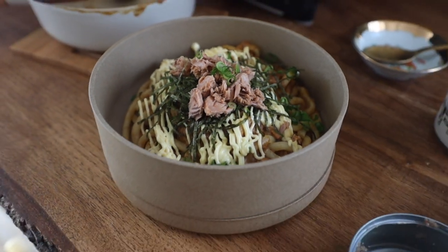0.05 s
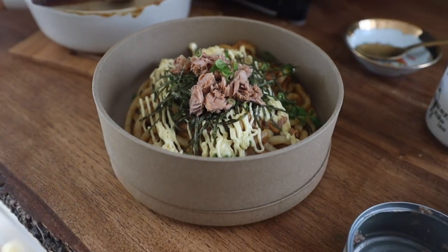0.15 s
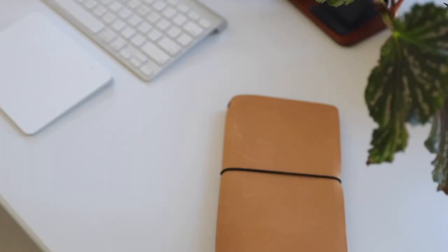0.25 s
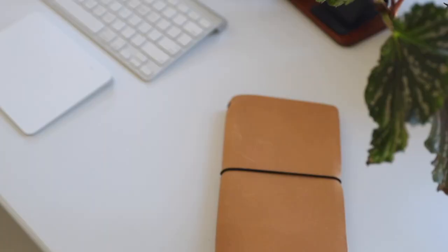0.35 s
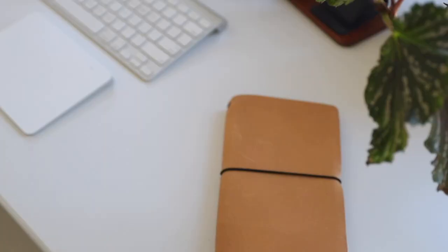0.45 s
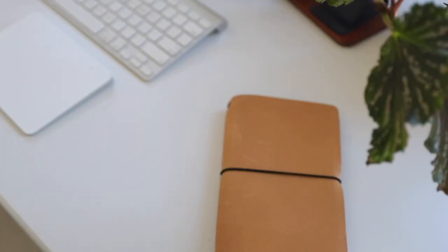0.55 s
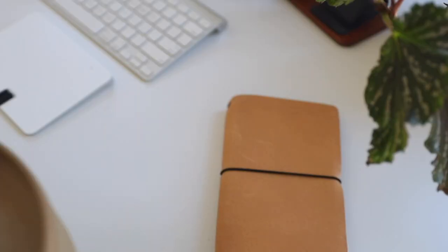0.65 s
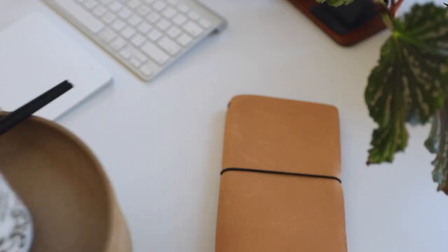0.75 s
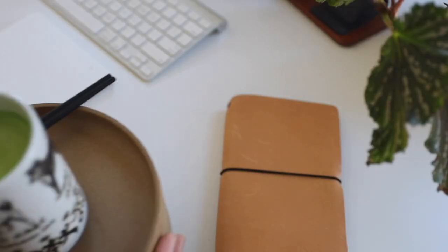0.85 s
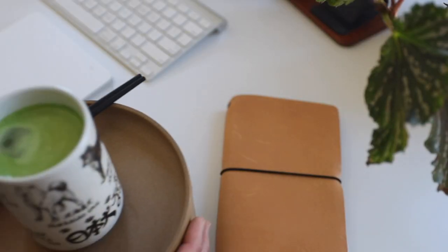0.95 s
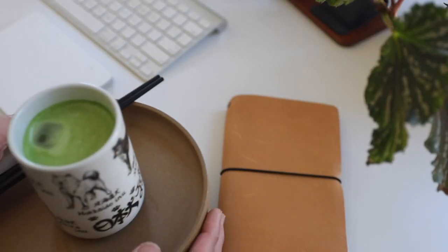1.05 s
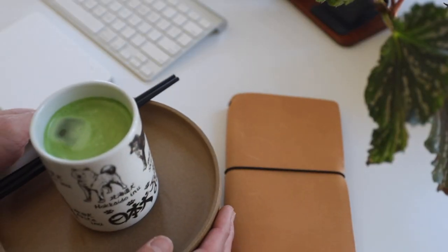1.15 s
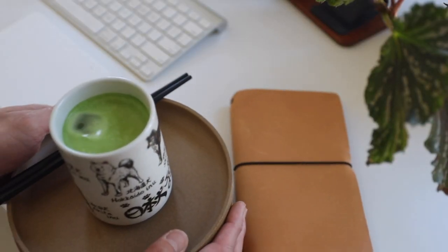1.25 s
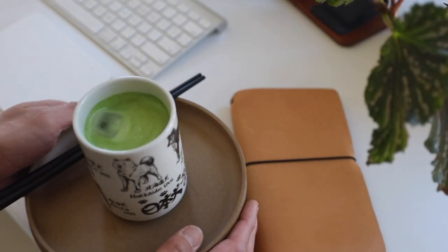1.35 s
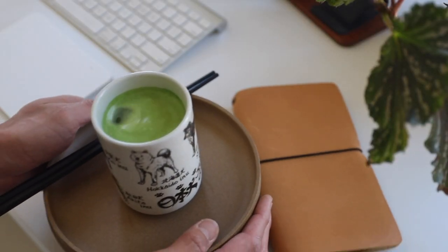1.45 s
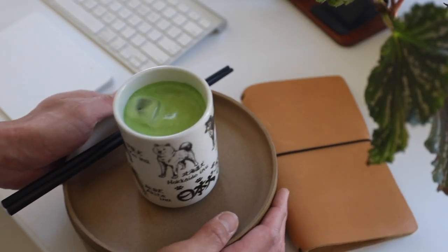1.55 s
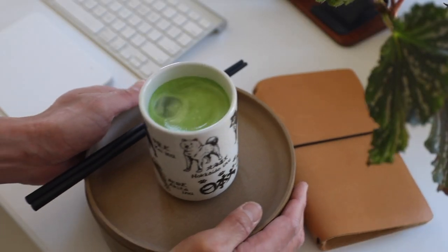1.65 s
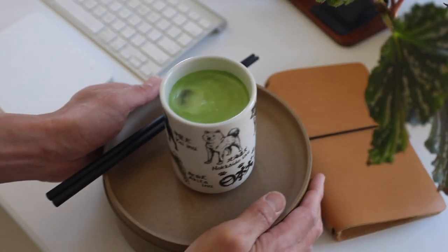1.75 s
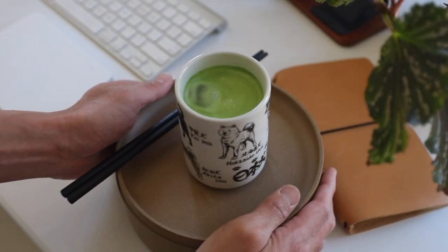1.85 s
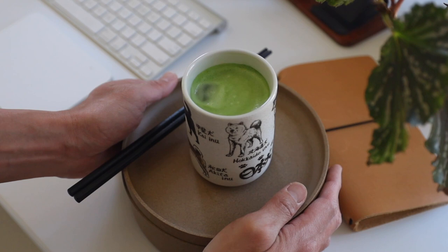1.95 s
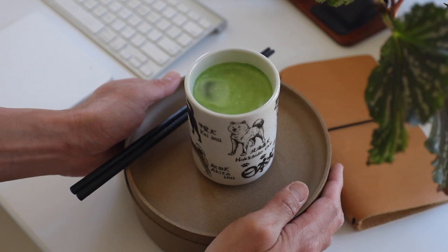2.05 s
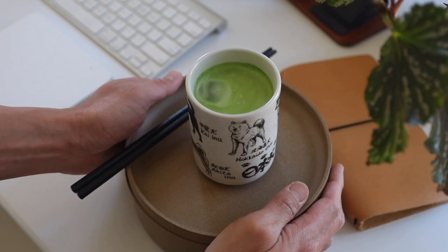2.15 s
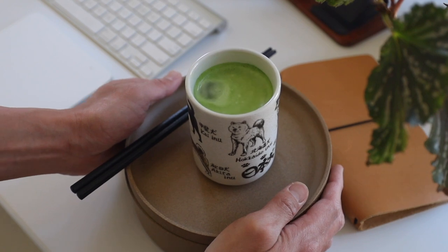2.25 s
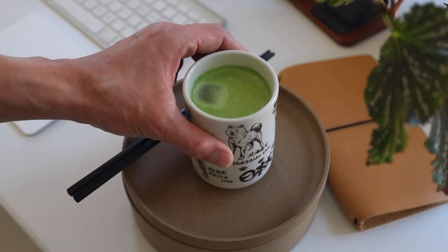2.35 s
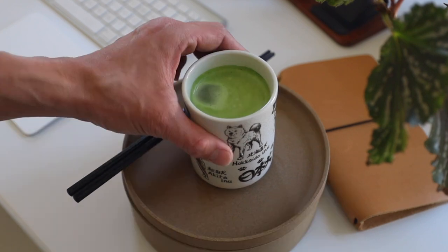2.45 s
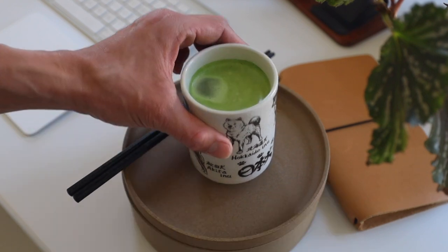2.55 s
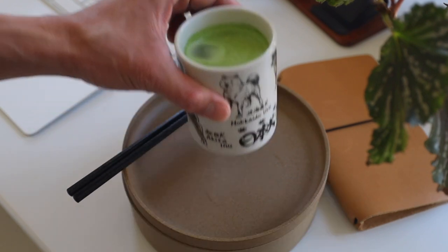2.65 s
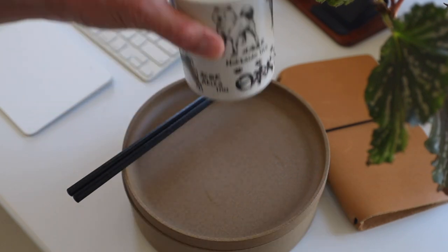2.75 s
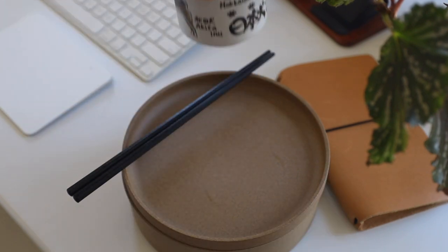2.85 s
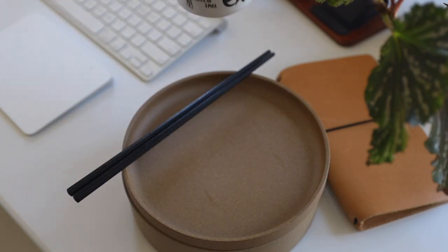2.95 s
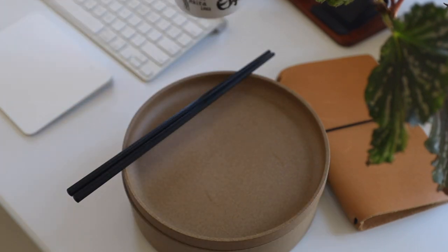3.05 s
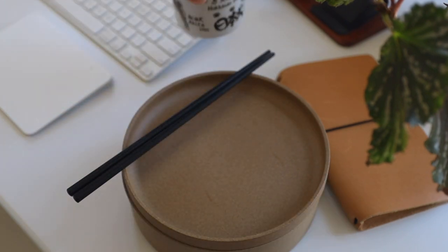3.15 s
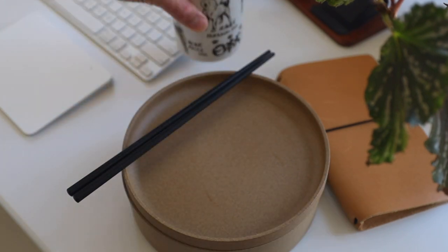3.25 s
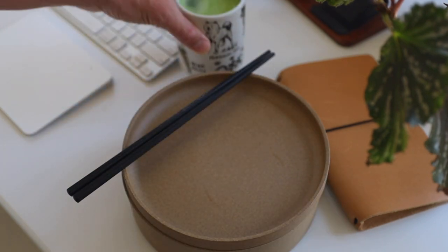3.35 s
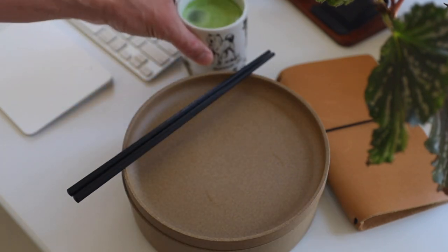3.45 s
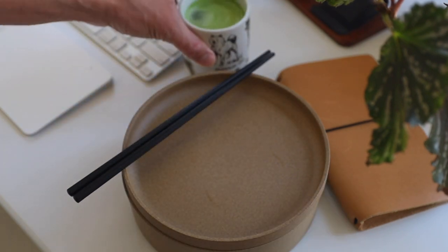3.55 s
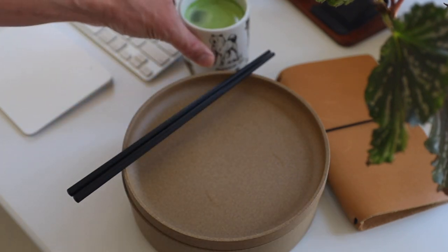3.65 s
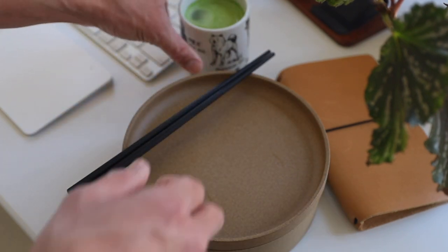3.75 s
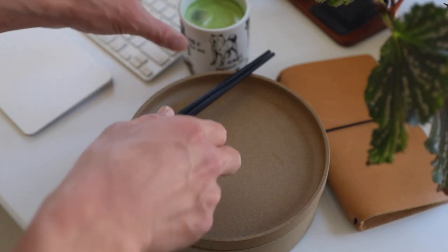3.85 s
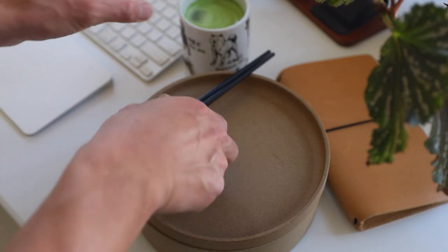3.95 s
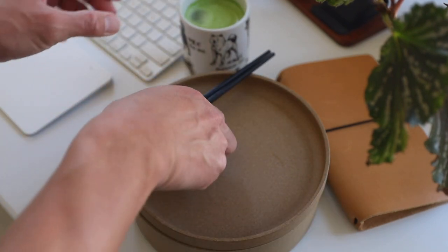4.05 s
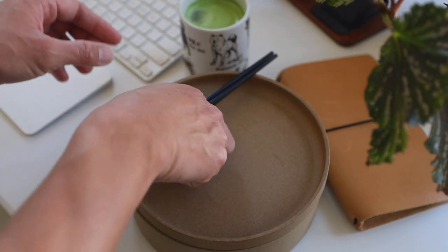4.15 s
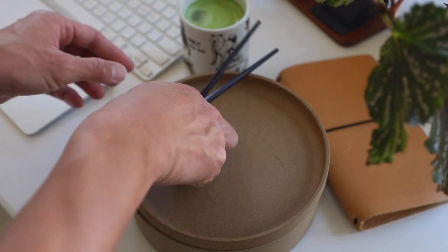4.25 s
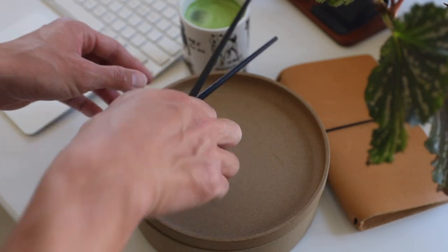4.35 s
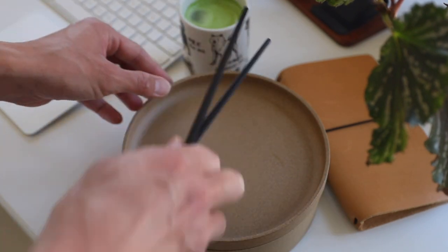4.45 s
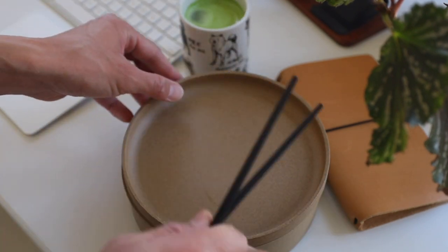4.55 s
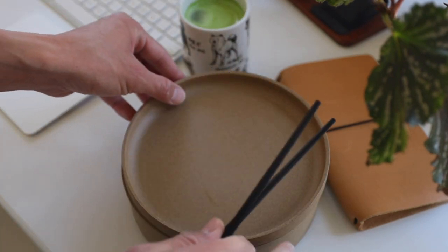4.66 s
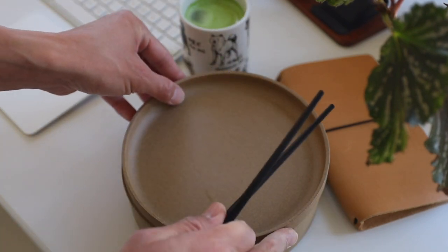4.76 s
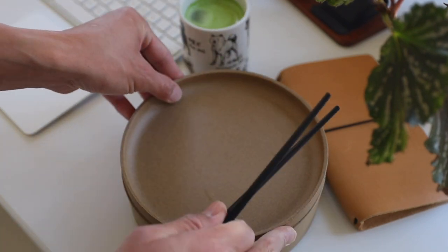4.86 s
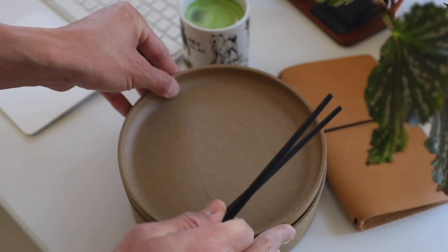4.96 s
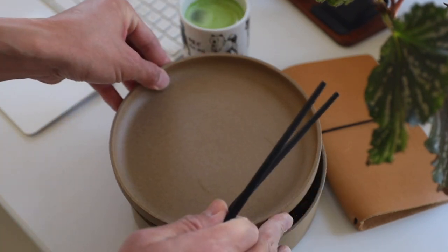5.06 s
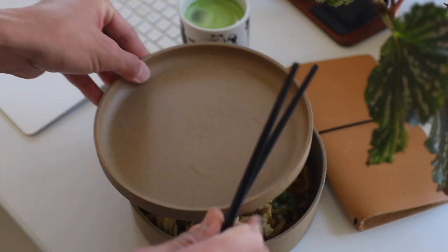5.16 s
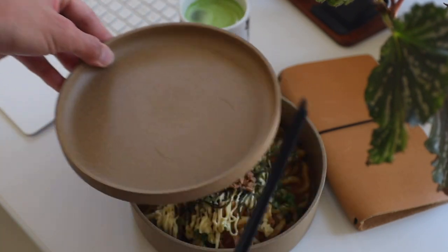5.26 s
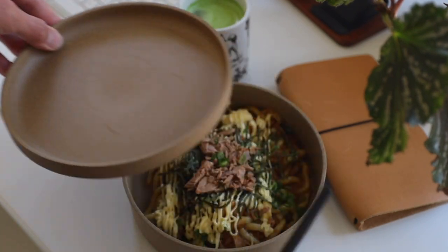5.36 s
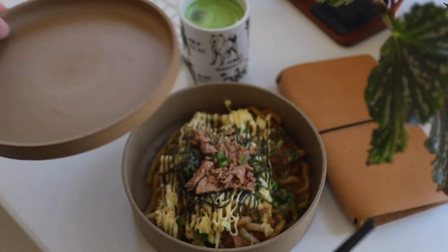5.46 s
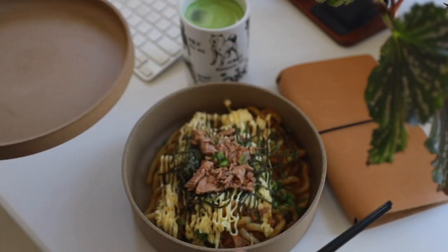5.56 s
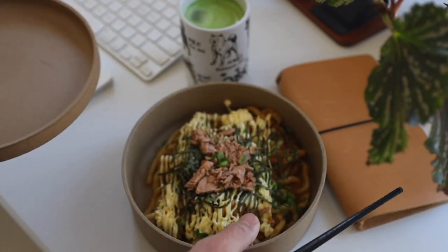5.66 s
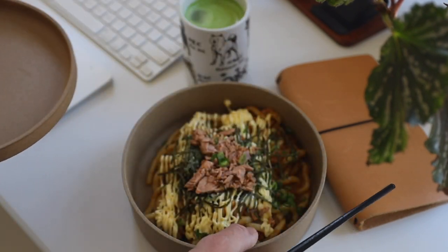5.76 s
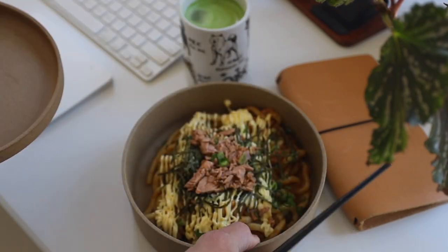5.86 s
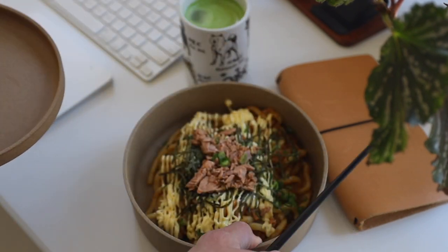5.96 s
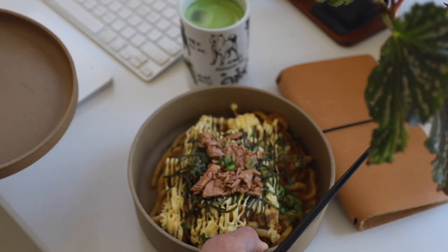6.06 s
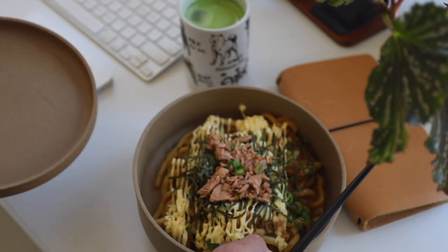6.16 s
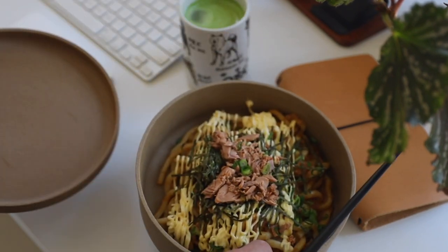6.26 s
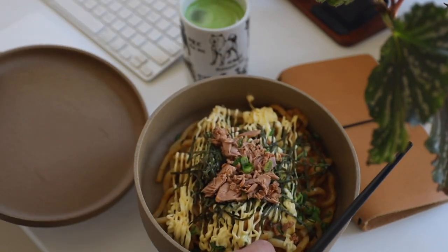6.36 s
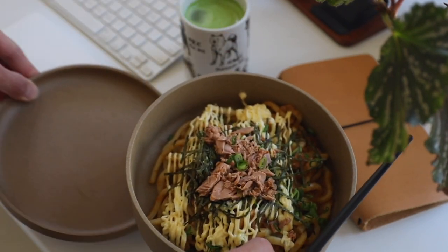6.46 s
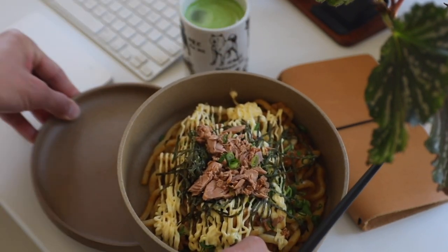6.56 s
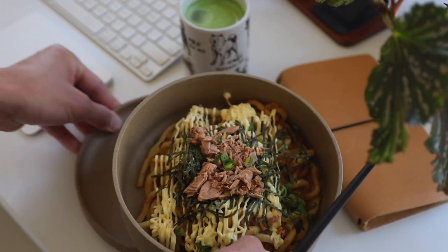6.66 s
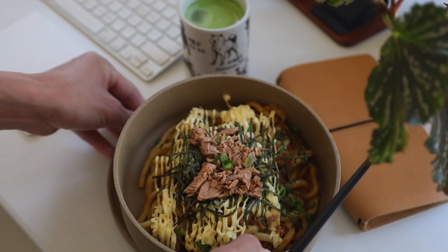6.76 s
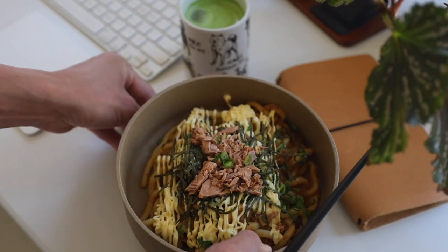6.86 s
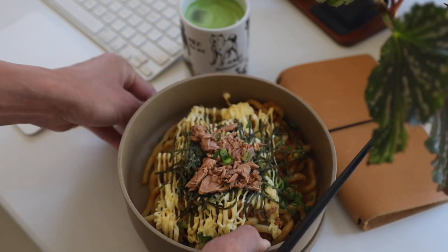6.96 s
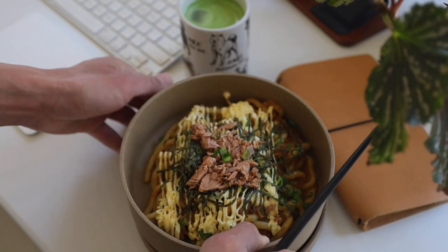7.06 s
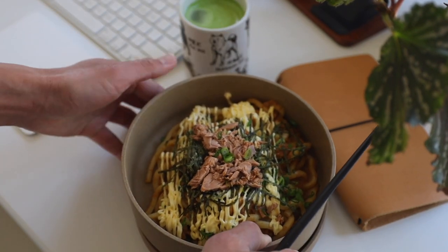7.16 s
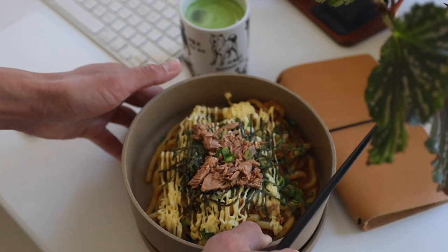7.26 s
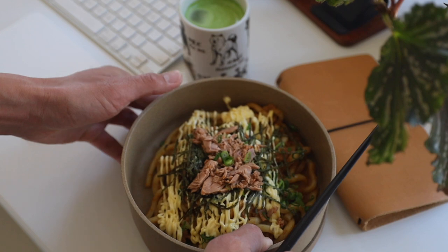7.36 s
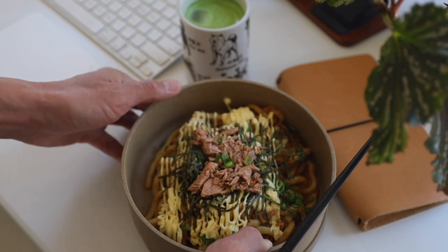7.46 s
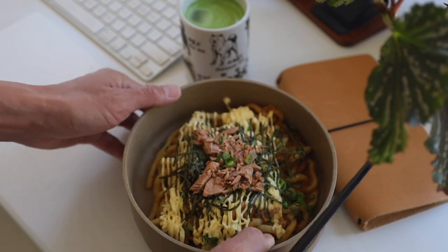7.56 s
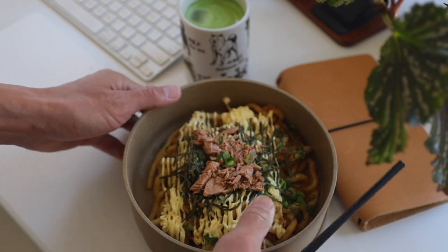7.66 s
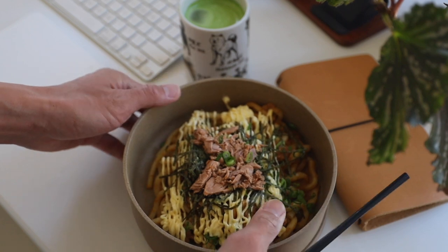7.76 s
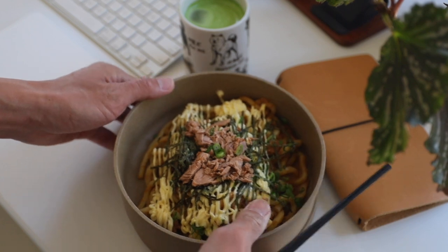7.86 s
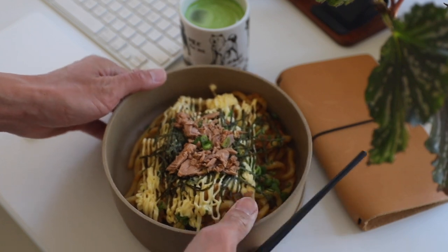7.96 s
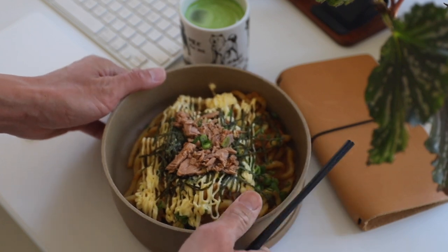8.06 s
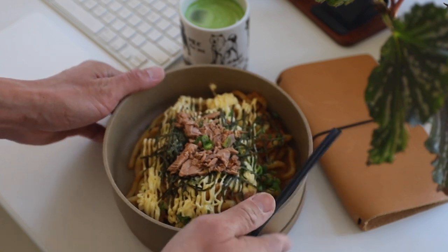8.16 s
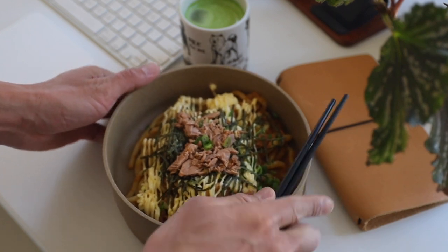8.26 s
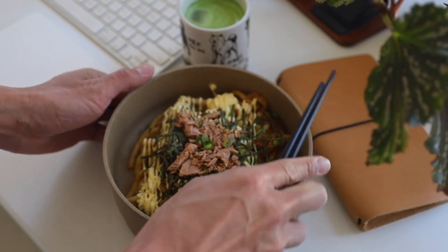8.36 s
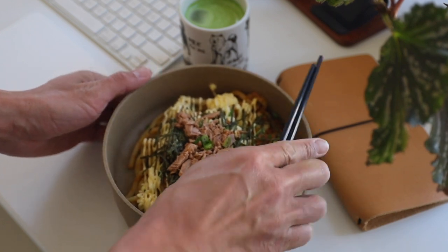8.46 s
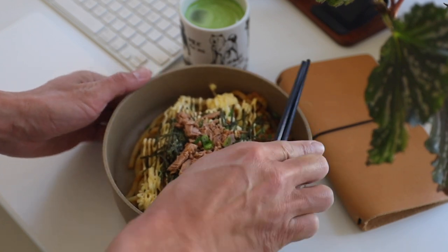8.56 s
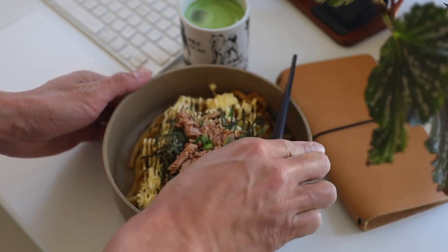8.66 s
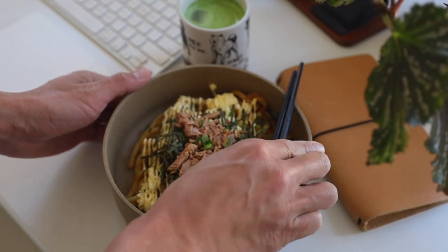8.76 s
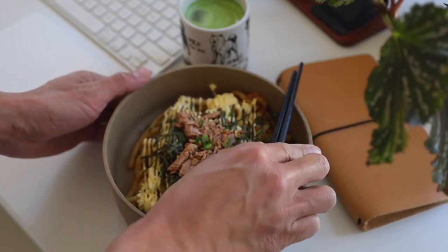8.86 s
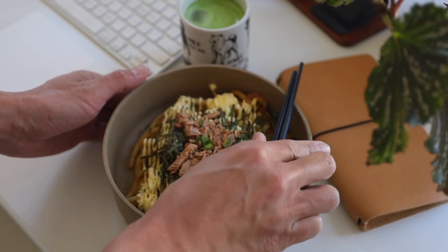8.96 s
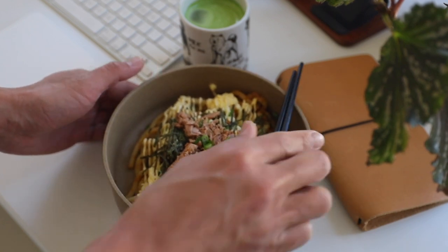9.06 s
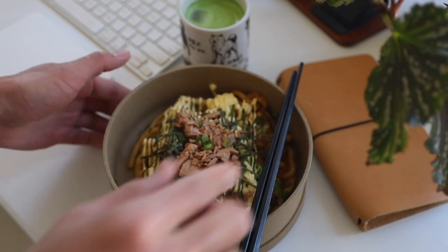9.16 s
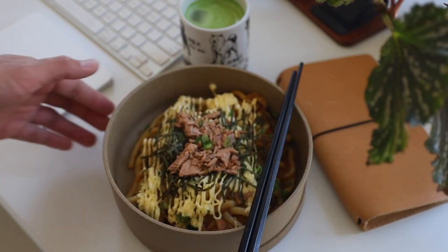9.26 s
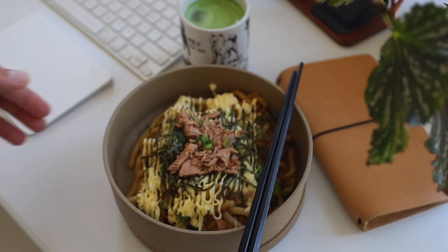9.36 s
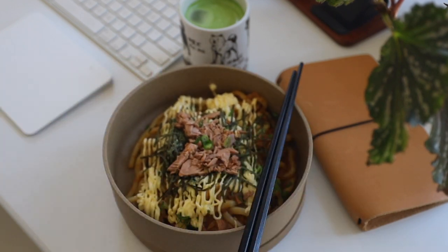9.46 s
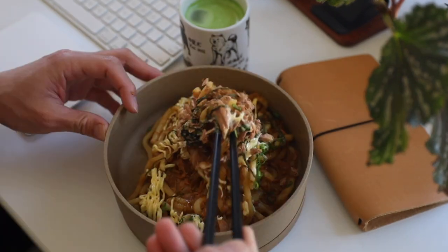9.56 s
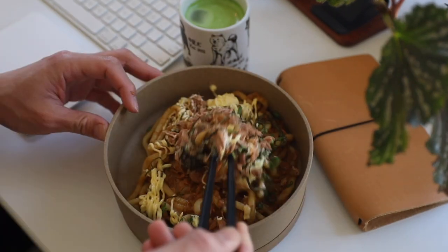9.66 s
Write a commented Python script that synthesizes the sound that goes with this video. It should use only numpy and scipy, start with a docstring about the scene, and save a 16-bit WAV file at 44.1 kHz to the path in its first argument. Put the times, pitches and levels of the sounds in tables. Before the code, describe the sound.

A faint whir and low room air run under close handling sounds, each with a short small-room echo. Hands brush softly on a stoneware bowl, and chopsticks scrape briefly at 1.1 seconds. Around 1.5 the bowl knocks down on a desk and slides into place. A cup ticks lightly as it is lifted at 2.4 and lands with a clink and thud at 3.5. Chopsticks click against the lid at 4.2; the lid scrapes near 4.8, and sharp ticks and light scrapes follow around 5.3. From 6.5 to 7.5 comes the loudest stretch: the lid knocks on the desk, grinds and squeals along it, and the bowl clunks into it. The bowl is pushed over the desk near 7.8. From 8.2 to 8.9 the chopsticks click, rub and clatter brightly in the hand, followed by one soft knock at 9.

```python
"""A lidded stoneware bowl of noodles knocks down on a desk and is pushed into place, close by.
A cup is lifted off the lid and put down, chopsticks are picked up, the lid is taken off and slid under
the bowl, and the chopsticks clatter in the hand. Impacts ring the dishes and thud in the desk top;
friction grinds, scrapes and squeals. A small room answers each knock; something whirs faintly in it."""
import sys
import numpy as np
from scipy import signal
from scipy.fft import next_fast_len
from scipy.io import wavfile

SR = 44100
rng = np.random.default_rng(int(sys.argv[2]) if len(sys.argv) > 2 else 0)


def store_wav(level_fs):
    """Save 16-bit WAV to argv[1]."""
    pcm = np.round(np.clip(np.atleast_2d(level_fs), -1, 1) * 32767)
    wavfile.write(sys.argv[1], SR, pcm.T.astype(np.int16))


N = 427769


def amp(db):
    """Decibels to gain."""
    return 10 ** (np.asarray(db) / 20)


def unit_rms(x):
    """Scale to rms 1."""
    return x / np.sqrt(np.mean(x ** 2) + 1e-20)


def unit_energy(x):
    """Scale to energy 1."""
    return x / (np.linalg.norm(x) + 1e-20)


def at_level(hit, db):
    """Scale a hit to the energy of 10 ms at rms level db."""
    return amp(db) * unit_energy(hit) * np.sqrt(SR / 100)


def lookup(curve, hz):
    """Interpolate on a log frequency axis."""
    f, value = np.transpose(curve)
    return np.interp(np.log(hz + 1), np.log(f + 1), value)


def add(mix, start_s, sound):
    """Mix in place at start_s."""
    part = mix[round(start_s * SR):][:len(sound)]
    part += sound[:len(part)]


def play(source, table):
    """One sound per row, at its time."""
    track = np.zeros(N)
    for start_s, *row in table:
        add(track, start_s, source(*row))
    return track


def butter(x, hz, kind, order=2):
    """Butterworth low-pass or high-pass."""
    return signal.lfilter(*signal.butter(order, min(hz, SR / 2 - 1000), kind, fs=SR), x)


def coloured(x, spectrum):
    """Minimum-phase filter with the given spectrum."""
    size = next_fast_len(len(x) + SR // 10)
    log_gain = np.log(amp(lookup(spectrum, abs(np.fft.fftfreq(size, 1 / SR)))))
    response = np.exp(np.conj(signal.hilbert(log_gain)))
    return np.fft.ifft(np.fft.fft(x, size) * response).real[:len(x)]


def narrow_noise(hz, width_hz, size):
    """Complex narrow-band noise around hz."""
    pole = np.exp(-np.pi * width_hz / SR)
    white = rng.standard_normal(size) + 1j * rng.standard_normal(size)
    drift = signal.lfilter([1], np.poly([pole, pole]), white)
    return drift * np.exp(2j * np.pi * hz * np.arange(size) / SR)


def contact(t60_s, scatter_db):
    """An impulse and the dense, quickly dying vibration behind it."""
    t = np.arange(SR // 3) / SR
    scatter = unit_energy(rng.standard_normal(len(t)) * amp(-60 * t / t60_s))
    return (t == 0) + amp(scatter_db) * scatter


def stroke(rise_s, fall_s):
    """Speed of a hand movement, 0 to 1 and back, then rest."""
    t = np.arange(round((rise_s + fall_s) * SR) + SR // 10) / SR
    return np.interp(t, [0, rise_s, rise_s + fall_s], [0, 1, 0]) ** 0.86


def grit(size, per_s, spread_db, hiss_db=-3):
    """Micro-slips of random size over smooth friction hiss."""
    slips = rng.standard_normal(size) * amp(spread_db * np.minimum(rng.exponential(1, size), 3))
    slips *= rng.random(size) < per_s / SR
    return unit_rms(unit_rms(slips) + amp(hiss_db) * rng.standard_normal(size))


# room noise spectra: f/Hz, relative level/dB
HUSH_SPECTRUM = [(25, -0.5), (70, -7.5), (220, -14), (1500, -34.5), (16000, -47)]
AIR_SPECTRUM = [(20, -10), (60, -2), (150, -7.5), (300, -9.5), (1000, -12.5), (1350, -12), (1800, -16.5),
                (3000, -26), (3700, -27), (16000, -35)]
# whir bands: f/Hz, width/Hz, level/dB
WHIR_BANDS = [(1332, 44, -52), (1388, 140, -55), (2920, 600, -60)]


def background(hush_db=-46, air_db=-48, air_from_s=0.287, wander_hz=20):
    """A low hush, then room air with a whir that wanders in pitch and strength."""
    hush = amp(hush_db) * unit_rms(coloured(rng.standard_normal(N), HUSH_SPECTRUM))
    air = amp(air_db) * unit_rms(coloured(rng.standard_normal(N), AIR_SPECTRUM))
    drift = narrow_noise(0, 10, N)
    wander = np.exp(2j * np.pi * np.cumsum(wander_hz * unit_rms(drift.real)) / SR)
    swell = amp(unit_rms(drift.imag))  # 1 dB rms
    whir = sum(amp(db) * unit_rms(swell * (wander * narrow_noise(hz, width_hz, N)).real)
               for hz, width_hz, db in WHIR_BANDS)
    return np.where(np.arange(N) / SR < air_from_s, hush, air + whir)


# skin friction spectrum: f/Hz, relative level/dB
SKIN_SPECTRUM = [(200, -11), (1000, 5.5), (3000, -5), (6000, -4.5), (9000, -13), (16000, -22)]
# hands shifting on the carried bowl: t/s, rise/s, fall/s, level/dB
RUBS = [(.58, 0.085, 0.46, -46.5), (1.031, 0.047, 0.87, -42.5)]


def rub(rise_s, fall_s, db):
    """Skin brushes the matt glaze and keeps it from ringing."""
    speed = stroke(rise_s, fall_s)
    friction = coloured(grit(len(speed), per_s=3000, spread_db=1), SKIN_SPECTRUM)
    return amp(db) * speed * unit_rms(friction)


# modes of the dishes and chopsticks: f/Hz, relative level/dB, t60/s
BOWL = [(1795, 0, .1), (2690, -2, .07), (3340, 0, .07), (3760, -3, .05), (4880, -3, .07), (6180, -6, .08),
        (7720, -7, .14), (8270, -8, .06), (9480, -7, .07), (11340, -10, .08), (13430, -7, .09),
        (15500, -9, .06)]
LID = [(1723, 20.5, 0.049), (3320, 14, 0.017), (3577, 6.5, 0.052), (4860, 5.5, .07), (5990, 9.5, 0.032),
       (6680, -13, 0.39), (8180, 2, 0.077), (8500, -1.5, 0.067), (9480, 2.5, 0.049), (10700, -18.5, 0.054),
       (12500, 1.5, 0.067), (13400, -1, 0.089), (14300, -12.5, 0.019)]
CUP = [(3670, 3, 0.12), (3480, 17.5, 0.036), (4850, 1.5, 0.15), (5820, 4, 0.13), (6330, -8, 0.12),
       (6804, -6, .2), (7940, 0, 0.078), (8200, 2, 0.12)]
STICKS = [(1537, 6, 0.044), (2660, 2.5, 0.024), (3020, 0.5, 0.024), (3660, 4, 0.032), (4856, -1, 0.036),
          (5140, -8.5, 0.12), (6290, -1, 0.057), (6790, 2.5, 0.031), (7910, 3.5, 0.021), (8460, 6, 0.026),
          (8200, -6, 0.029), (9240, -4.5, 0.054), (9990, -1.5, 0.039), (12600, -3, 0.026),
          (14300, -33, 0.016)]
BOWL_IN_LID = [(3600, 1.5, 0.072), (5800, 3.5, 0.041), (8320, -5.5, 0.11), (10900, -12.5, 0.1),
               (13400, -3, 0.089)]
MODES = {"bowl": BOWL, "lid": LID, "cup": CUP, "sticks": STICKS, "nested": BOWL_IN_LID}


def ring(thing, spread_db=2):
    """Decaying modes; each contact point weights them differently."""
    t = np.arange(SR // 3) / SR
    ringing = 0
    for hz, db, t60_s in MODES[thing]:
        envelope = amp(db + spread_db * rng.standard_normal() - 60 * t / t60_s)
        ringing += envelope * rng.choice([-1, 1]) * np.sin(2 * np.pi * hz * t)
    return unit_energy(ringing)


def to_desk_db(hz):
    """Heavier, lower contacts pass more through the dish into the desk: 8 dB per octave."""
    return -8 * np.log2(hz / 2700)


# thing: ring re contact/dB
SCRAPE_RING_DB = {"bowl": 4.5, "lid": 5.5, "cup": 28, "sticks": 6}
# stoneware and chopsticks rubbing: t/s, rise/s, fall/s, level/dB, f/Hz, thing
SCRAPES = [(1.107, 0.0308, 0.0297, -27.5, 2230, "sticks"), (1.629, 0.0065, 0.26, -41.5, 4000, "bowl"),
           (3.49, 0.053, 0.11, -41, 6440, "cup"), (4.173, 0.05, 0.032, -26.5, 2690, "lid"),
           (4.802, 0.021, 0.075, -25, 1770, "bowl"), (4.889, 0.059, 0.14, -47.5, 3600, "bowl"),
           (5.319, 0.07, 0.037, -34, 12500, "sticks"), (5.459, 0.072, 0.037, -41.5, 7000, "sticks"),
           (5.75, 0.033, 0.078, -44.5, 2800, "bowl"), (6.6, 0.12, 0.28, -34, 2700, "lid"),
           (8.356, 0.017, 0.029, -39, 4450, "bowl"), (8.629, 0.076, .032, -21.5, 4000, "sticks"),
           (8.779, 0.023, 0.056, -27, 3240, "sticks")]


def scrape(rise_s, fall_s, db, hz, thing, spots=3, edge_ratio=2.09):
    """Grit catches and lets go at several spots, ringing the modes; the desk rumbles along."""
    speed = stroke(rise_s, fall_s)
    rubbed = 0
    for _ in range(spots):
        tick = unit_energy(contact(t60_s=0.0099, scatter_db=-14))
        body = tick + amp(SCRAPE_RING_DB[thing]) * ring(thing)
        body = butter(body, hz / edge_ratio, "high", order=3)
        body = unit_energy(butter(body, hz * edge_ratio, "low", order=1))
        rubbed += signal.fftconvolve(speed * grit(len(speed), per_s=300, spread_db=0), body)
    sound = amp(db) * rubbed / np.sqrt(spots)
    rumble_db = db + 1 + to_desk_db(hz)
    add(sound, 0, slide(rise_s, fall_s, rumble_db, hard_hz=1970, boom_hz=524.3, boom_width_hz=490))
    return sound


# thing: ring re contact/dB
CLICK_RING_DB = {"bowl": 3, "lid": 4.5, "cup": 5.5, "sticks": 0, "nested": 9}
# clinks and clicks: t/s, level/dB, f/Hz, thing
CLICKS = [(1.349, -31.5, 4300, "lid"), (1.412, -40.5, 5900, "lid"), (1.6634, -24, 3500, "bowl"),
          (2.4132, -34, 9000, "cup"), (3.4858, -25.5, 5100, "cup"), (4.232, -26.5, 6530, "lid"),
          (4.273, -21, 2700, "lid"), (4.994, -44.5, 9000, "bowl"), (5.316, -17.5, 15000, "sticks"),
          (5.481, -34.5, 8500, "sticks"), (5.711, -44.5, 6000, "bowl"), (7.143, -34.5, 2360, "nested"),
          (7.337, -45.5, 5800, "nested"), (7.4334, -35, 5800, "nested"), (7.445, -28, 1650, "sticks"),
          (7.519, -42.5, 7160, "nested"), (7.639, -47.5, 8000, "nested"), (7.76, -52.5, 7500, "nested"),
          (8.177, -22, 3560, "sticks"), (8.232, -40, 8400, "sticks"), (8.2926, -37, 6230, "sticks"),
          (8.629, -23, 2300, "sticks"), (8.6734, -19.5, 3200, "sticks"), (8.681, -17, 8900, "sticks"),
          (8.768, -13.5, 5000, "sticks"), (8.7962, -24, 5000, "sticks")]


def click(db, hz, thing, edge_ratio=1.95):
    """A small hard contact: a tick, the thing's modes and a thud through the bowl."""
    tick = amp(-8.5) * contact(t60_s=0.018, scatter_db=5.5)
    clink = tick + amp(CLICK_RING_DB[thing]) * ring(thing)
    clink = butter(clink, hz / edge_ratio, "high", order=3)
    clink = butter(clink, hz * edge_ratio, "low", order=3)
    thud = knock(db - 3.5 + to_desk_db(hz), hard_hz=1970, boom_hz=906, thing="bowl")
    return at_level(clink, db) + thud


def boom_gain(hard_hz):
    """Harder contacts boom less: 3 dB per octave."""
    return amp(-3 - 3 * np.log2(hard_hz / 1300))


# desk top response: f/Hz, relative level/dB
DESK_SPECTRUM = [(30, -25.5), (110, -19.5), (180, -13), (300, 0.5), (500, 0.5), (1000, 1), (2000, -1),
                 (4000, -7.5), (8000, -11), (16000, -54)]
# crockery on the desk: t/s, level/dB, hardness cutoff/Hz, boom f/Hz, thing
KNOCKS = [(1.381, -27, 600, 400, "bowl"), (1.3901, -21, 850, 753, "bowl"), (1.4983, -7, 1420, 1108, "bowl"),
          (1.583, -24, 1380, 897, "bowl"), (1.6626, -10, 3200, 1300, "bowl"),
          (2.4509, -27.5, 2320, 286, "cup"), (3.4858, -8, 1170, 810, "cup"),
          (3.4896, -14, 1490, 1063, "cup"), (3.687, -23.5, 304, 287, "cup"),
          (4.993, -30.5, 680, 317, "bowl"), (6.563, -8.5, 1210, 952, "lid"),
          (6.6064, -16, 1130, 830, "lid"), (6.926, -7.5, 2350, 857, "lid"),
          (7.143, -8, 1300, 785, "nested"), (7.338, -30.5, 810, 850, "nested"),
          (7.4329, -17, 1170, 605, "nested"), (7.445, -14, 1640, 438, "nested"),
          (7.542, -26.5, 1060, 396, "nested"), (9.0025, -32.5, 2470, 1520, "bowl")]


def knock(db, hard_hz, boom_hz, thing, boom_t60_s=0.047):
    """The desk thuds, booms at a pitch set by where it is hit, and damps the dish's ring."""
    t = np.arange(SR // 3) / SR
    impact = coloured(contact(t60_s=0.037, scatter_db=12.5), DESK_SPECTRUM)
    thud = unit_energy(butter(impact, hard_hz, "low"))
    boom = unit_energy(np.sin(2 * np.pi * boom_hz * t) * amp(-60 * t / boom_t60_s))
    dish = amp(-23.5) * butter(ring(thing), 7500, "low")  # a blunt blow favours the lower modes
    return at_level(thud + boom_gain(hard_hz) * boom + dish, db)


# desk top resonances: f/Hz, width/Hz, gain/dB
DESK_MODES = [(224, 67, -18.5), (312.5, 4, -6), (515, 2.5, -28), (559, 9.1, -6)]


def desk_hum(shake):
    """The desk top hums on briefly after being shaken."""
    return sum(amp(db) * signal.lfilter(*signal.iirpeak(hz, hz / width_hz, fs=SR), shake)
               for hz, width_hz, db in DESK_MODES)


# crockery dragged over the desk: t/s, rise/s, fall/s, level/dB, hardness cutoff/Hz, top boom f/Hz
SLIDES = [(1.485, 0.0817, 0.5, -21.5, 1300, 430), (1.781, 0.0805, 0.26, -40, 700, 280),
          (1.632, 0.022, .21, -33.5, 120, 50.3), (3.495, 0.086, 0.111, -25.5, 1180, 621),
          (4.90, 0.0405, 0.133, -27.5, 617, 438.7), (6.005, 0.07, 0.053, -27.5, 640, 290.8),
          (6.58, 0.037, 0.21, -25.5, 1520, 604), (6.73, 0.0697, .25, -20.5, 1650, 400),
          (7.16, 0.049, .08, -45, 990, 800), (7.45, 0.069, 0.096, -39, 880, 329.7),
          (7.80, .14, 0.12, -18, 1220, 629.2)]


def slide(rise_s, fall_s, db, hard_hz, boom_hz, boom_width_hz=110):
    """An unglazed foot grinds over the desk and shakes it; duller and lower as it slows."""
    speed = stroke(rise_s, fall_s)
    friction = coloured(grit(len(speed), per_s=1500, spread_db=1.8), DESK_SPECTRUM)
    fast = unit_rms(butter(friction, hard_hz, "low"))
    slow = unit_rms(butter(friction, 0.67 * hard_hz, "low"))
    rumble = speed * fast + (1 - speed) * slow
    cycles = np.cumsum(boom_hz * (0.7 + 0.3 * speed)) / SR
    boom = unit_rms((narrow_noise(0, boom_width_hz, len(speed)) * np.exp(2j * np.pi * cycles)).real)
    return amp(db) * speed * unit_rms(rumble + boom_gain(hard_hz) * boom)


# friction tones: t/s, rise/s, fall/s, level/dB, f/Hz, width/Hz
SQUEALS = [(5.459, 0.034, .06, -33, 5700, 1100), (6.55, 0.2, .03, -23, 1787, 21),
           (6.55, 0.16, 0.4, -33.5, 3257, 120), (6.72, 0.046, 0.29, -20.5, 1300, 85),
           (8.358, 0.0067, 0.079, -35, 6185, 9)]


def squeal(rise_s, fall_s, db, hz, width_hz, roughness=0.37):
    """Stick-slip locks on to one resonance: a tone if narrow, a rasp if wide; grit roughens it."""
    speed = stroke(rise_s, fall_s)
    resonance = narrow_noise(hz, width_hz, len(speed))
    tone = resonance.real / np.sqrt(abs(resonance) + 1e-12)  # halves the level swings in dB
    grip = 1 + roughness * unit_rms(narrow_noise(0, 220, len(speed)).real)
    return amp(db) * speed * unit_rms(grip * tone)


# room decay: f/Hz, t60/s
ROOM_T60 = [(150, 0.45), (500, 0.47), (1400, 0.39), (4000, 0.32), (9000, 0.28), (15000, 0.13)]
# echo spectrum: f/Hz, level/dB
ECHO_SPECTRUM = [(100, 1.5), (300, -5.5), (1000, -8), (4000, -7), (14000, -10.5)]


def room_echo(x, build_s=0.0097, reflections_per_s=5000):
    """Dense reflections build up, then each band dies at its own rate."""
    taps = rng.standard_normal(SR) * (rng.random(SR) < reflections_per_s / SR)
    hz, t, bands = signal.stft(taps, SR, nperseg=256)
    envelope = amp(-60 * t / lookup(ROOM_T60, hz)[:, None]) * (1 - np.exp(-(t / build_s) ** 2))
    envelope /= np.linalg.norm(envelope, axis=1, keepdims=True)
    tail = unit_energy(signal.istft(bands * envelope, SR, nperseg=256)[1])
    return signal.fftconvolve(x, coloured(tail, ECHO_SPECTRUM))[:N]


def scene():
    """Handling sounds, their echo and the background, in mono."""
    on_desk = play(knock, KNOCKS) + play(slide, SLIDES)
    direct = on_desk + desk_hum(on_desk)
    direct += play(click, CLICKS) + play(scrape, SCRAPES) + play(squeal, SQUEALS) + play(rub, RUBS)
    return (direct + room_echo(direct) + background())[None]


def record(dry):
    """The hardest knocks overload at full scale; low-pass at 16.1 kHz."""
    low_pass = signal.firwin(511, 16100, window=("kaiser", 9), fs=SR)
    return signal.oaconvolve(np.clip(dry, -1, 1), low_pass[None], "same")


dry = scene()
out = record(dry)
store_wav(out)
```